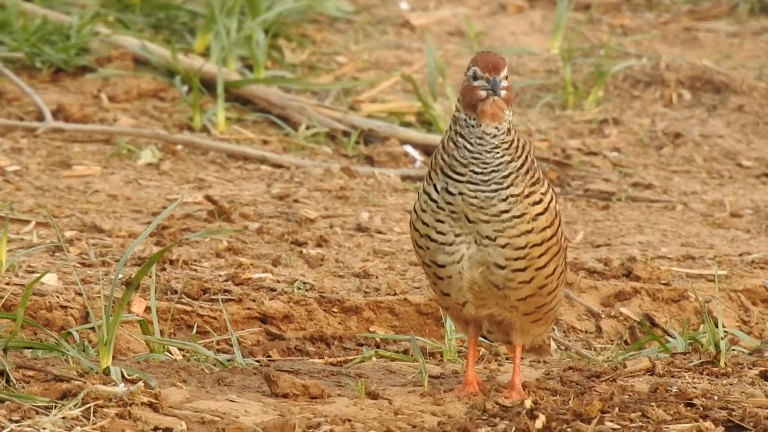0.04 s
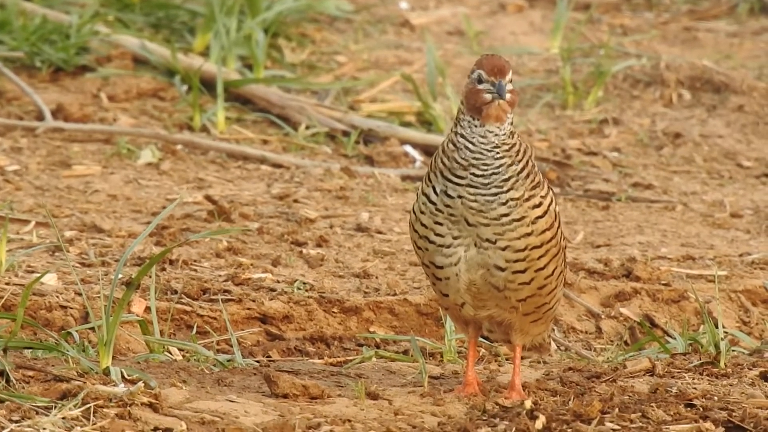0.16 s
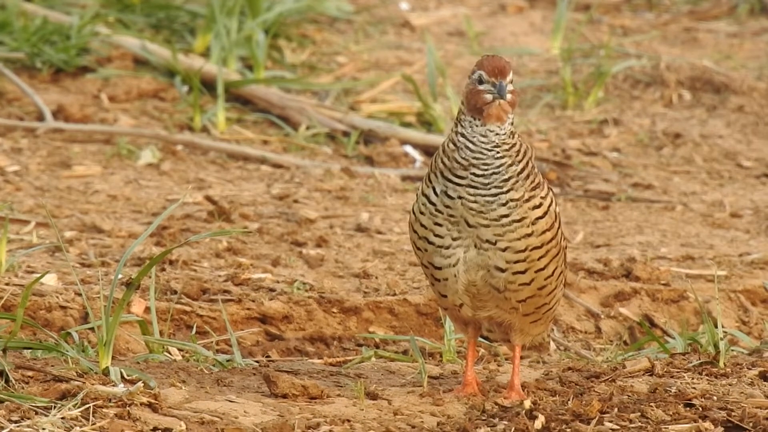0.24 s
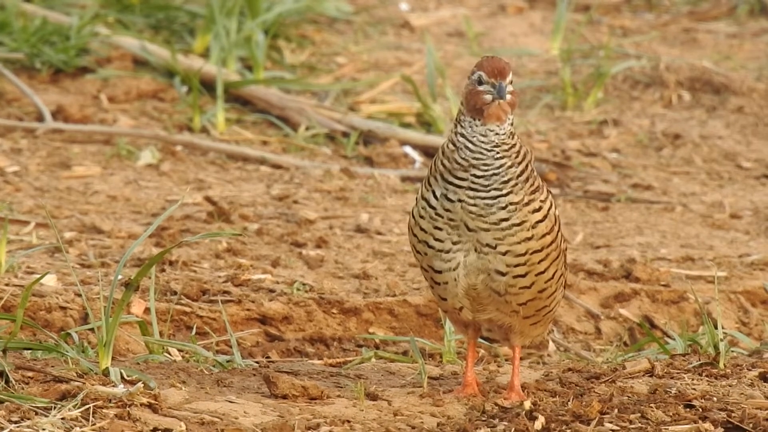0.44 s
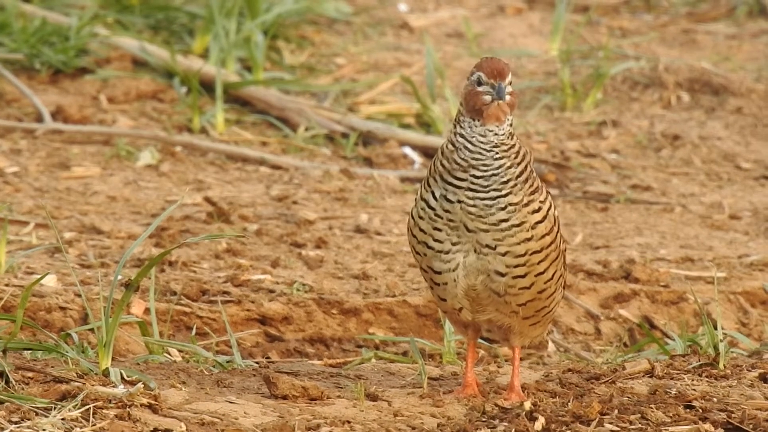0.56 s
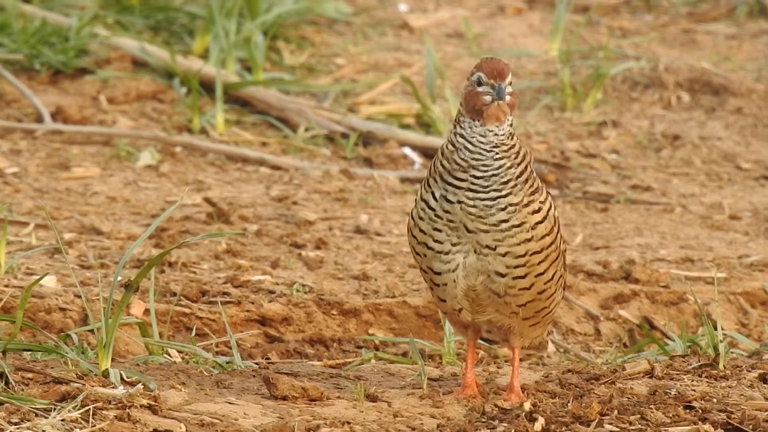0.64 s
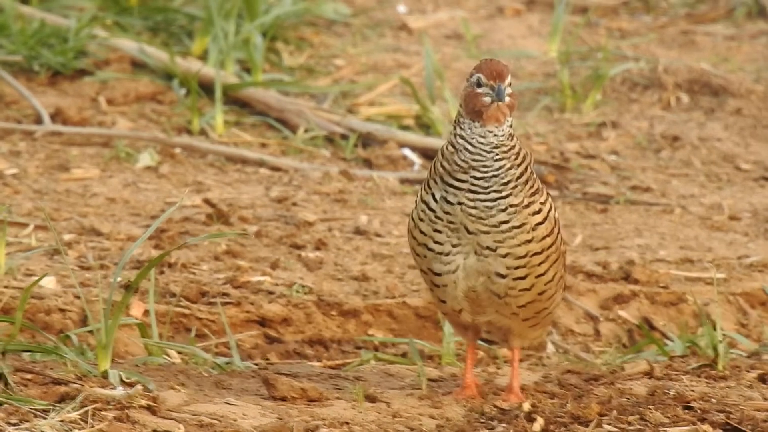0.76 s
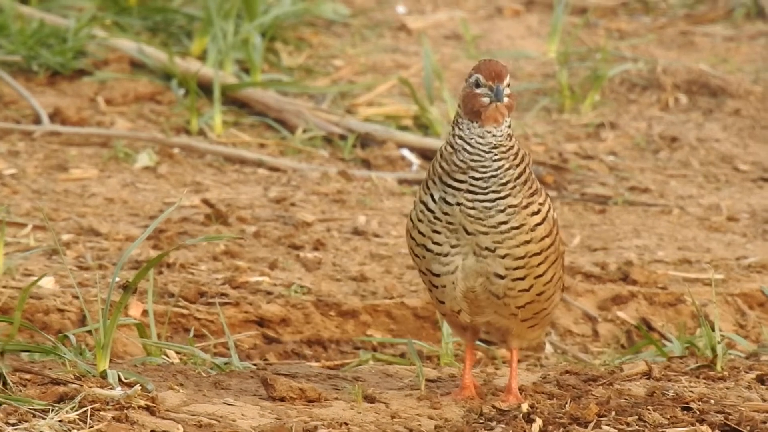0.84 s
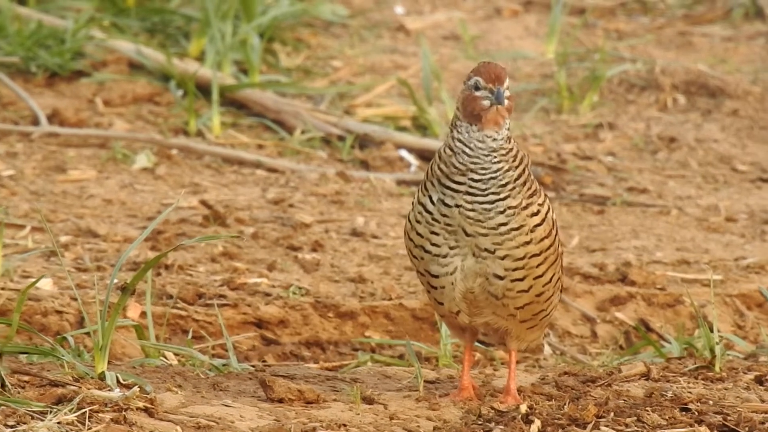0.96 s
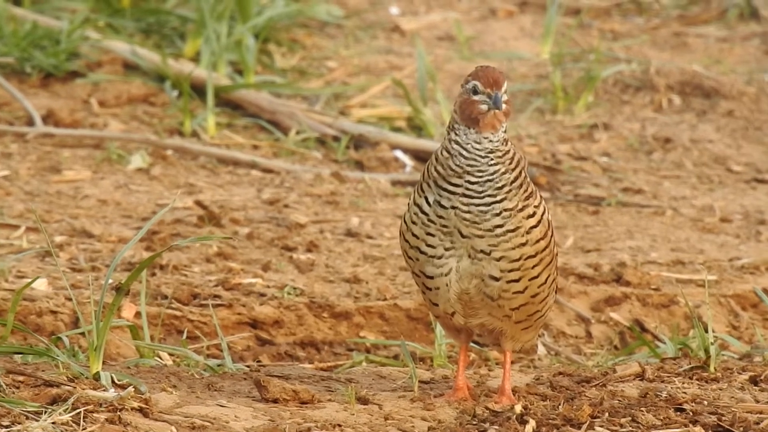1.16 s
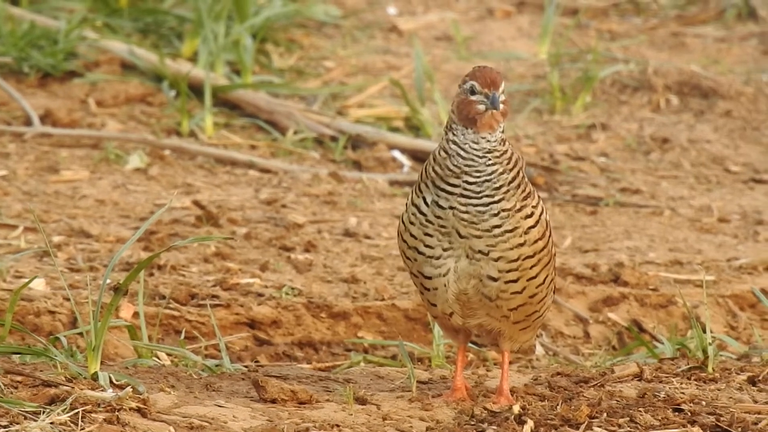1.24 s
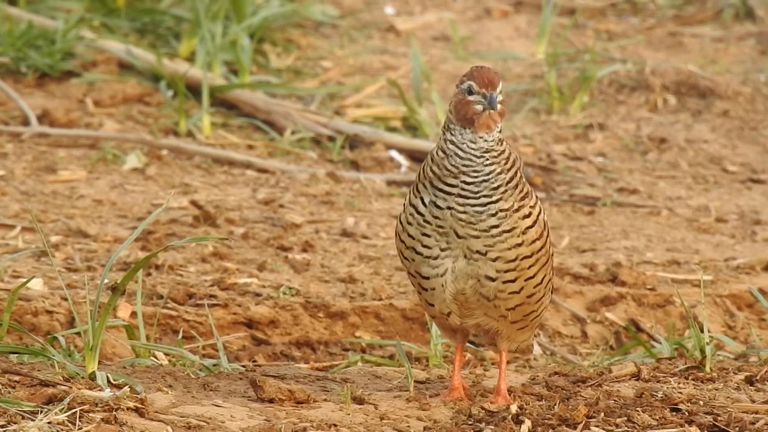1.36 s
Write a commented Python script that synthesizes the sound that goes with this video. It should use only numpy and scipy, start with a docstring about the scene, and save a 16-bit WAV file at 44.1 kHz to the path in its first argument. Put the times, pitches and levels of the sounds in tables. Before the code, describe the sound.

A quail gives two soft peeps and two loud chirps outdoors, with faint distant birds.

```python
"""Bare ground in scrub: a quail close to the microphone gives two soft peeps, then two loud chirps.
Each chirp opens with a rasp, leaps to a whistle in which the two sides of the syrinx beat, and ends
in two quick arches. Small birds whistle farther off to the right; the scrub scatters all the calls.
One knock, faint rustles and two puffs of air on the microphone sit over a quiet hush."""
import sys
import numpy as np
from scipy import signal
from scipy.fft import rfft, irfft
from scipy.io import wavfile
from scipy.ndimage import uniform_filter1d, minimum_filter1d

SR = 44100
rng = np.random.default_rng(int(sys.argv[2]) if len(sys.argv) > 2 else 0)


def generate_wav(sig):
    """Save sig (samples, or channels by samples) to the path in sys.argv[1] as 16-bit PCM at SR."""
    pcm = np.round(np.clip(np.atleast_2d(sig).T, -1, 1) * 32767).astype(np.int16)
    wavfile.write(sys.argv[1], SR, pcm)


N = 61739
T = np.arange(N) / SR
JITTER_RATE_HZ = 508


def quail_chirps():
    """Two voices glide a few hundred hertz apart and beat; fast glides turn hoarse."""
    # chirp contours: (time [s], pitch [Hz], level [dB], octave level [dB],
    # second voice offset [Hz], second voice re first [dB])
    first_chirp = [(.232, 3000, -58.5, -50, 599.4, 8), (.245, 2896, -51, -29, 550.6, -1.5),
                   (.257, 2810, -42.5, -22.5, 371, 7.5), (.273, 3105, -36, -12.5, 395, -12),
                   (.277, 3845, -16, -30.5, 300, -16), (.281, 4720, -7, -36, 452, -6),
                   (.287, 4916, -10, -56, 347, -1), (.305, 4820, -16.5, -49, 270, -8.5),
                   (.310, 4502, -18.5, -53.5, 355, 10.5), (.315, 3570, -23, -39, 495, -8),
                   (.319, 3423, -21, -48, 400, -29), (.323, 4490, -10.5, -40, 253, -22),
                   (.327, 4890, -9.5, -47, 250, -18), (.330, 4130, -18.5, -42, 400, 0),
                   (.333, 3177, -26.5, -32, 300, -26), (.340, 3425, -20, -30.5, 202, -32),
                   (.345, 3570, -11.5, -28.5, 150, -35), (.356, 3910, -10.5, -41, 149, -29),
                   (.361, 4493, -10, -37, 494, -1), (.366, 3573, -18.5, -32, 495, -29),
                   (.372, 3280, -17, -30.5, 398, -12), (.376, 3607, -14.5, -41, 840, -6),
                   (.383, 3060, -36, -50, 694, 1)]
    second_chirp = [(.942, 2800, -62, -50, 600, 1), (.962, 2859, -49.5, -35, 600, 6.5),
                    (.970, 3000, -41, -21, 510, -20), (.978, 3023, -37.5, -11, 204, -15),
                    (.982, 3200, -33, -12, 304, -12), (.987, 3767, -17.5, -30.5, 306, -15),
                    (.993, 4710, -8, -38.5, 400, -6), (.998, 4950, -10.5, -51, 317, -4),
                    (1.015, 4890, -13, -51, 272, -4.5), (1.022, 4863, -15, -48, 320, 0),
                    (1.027, 3697, -28, -41, 593, -33), (1.034, 3360, -19.5, -33.5, 400, -8),
                    (1.038, 4657, -10, -41, 250, -15), (1.042, 4950, -9.5, -70, 294, -19),
                    (1.047, 3576, -28, -42, 294, -10), (1.054, 3318, -17.5, -28.5, 198, -15),
                    (1.062, 3450, -27, -41, 150, -25), (1.065, 3517, -11.5, -29.5, 149, -46),
                    (1.074, 3972, -9.5, -46, 199, -20), (1.078, 4470, -10, -50, 442, -6.5),
                    (1.084, 3325, -17, -32, 450, -6), (1.090, 3224, -17.5, -31.5, 456, -25),
                    (1.097, 2720, -36, -41, 503, -8)]
    # air hiss riding on the tones: (frequency [Hz], density [dB])
    air_colour = [(600, -34), (1600, -11), (3000, -3.5), (6500, 4.5), (9000, -8.5), (12000, -12.5),
                  (16000, -24)]
    hoarse_hz_per_s, air_db = 44000, -30
    chirps = np.zeros(N)
    for contour in (first_chirp, second_chirp):
        hz, level_db, octave_db, offset_hz, second_db = follow(contour, T)
        glide_hz_per_s = uniform_filter1d(abs(np.gradient(hz)) * SR, size=200)
        hoarseness = 0.3 + np.tanh(glide_hz_per_s / hoarse_hz_per_s)
        air = amp(air_db + level_db) * hoarseness * noise(lambda f: amp(at_hz(air_colour, f)))
        lower = syrinx_voice(hz, level_db, octave_db)
        upper = amp(second_db) * syrinx_voice(hz + offset_hz, level_db, octave_db)
        chirps += gate(contour[0][0], contour[-1][0]) * (lower + upper + air)
    return chirps


def syrinx_voice(hz, level_db, octave_db):
    """One side of the syrinx: a slightly unsteady tone with two rougher overtones."""
    # throat response on the overtones: (frequency [Hz], gain [dB])
    throat = [(3000, 6.5), (7300, 0), (8500, -4.5), (10500, -7), (12000, -22), (16000, -28)]
    jitter, rough_rad, third_db, shimmer_db = 0.009, 0.26, -14, 1.5
    phase = phase_of(hz * (1 + jitter * wander(JITTER_RATE_HZ)))
    rough_phase = phase + rough_rad * wander(2 * JITTER_RATE_HZ)
    third_gain = amp(third_db) / (1 + amp(octave_db - level_db))
    overtones = np.sin(2 * rough_phase) + third_gain * np.sin(3 * rough_phase)
    tone = amp(level_db) * np.sin(phase) + coloured(amp(octave_db) * overtones, throat)
    return np.sqrt(2) * amp(shimmer_db * wander(JITTER_RATE_HZ)) * tone


def quail_rasps():
    """A grainy swell with a ragged falling tone, before each chirp's whistle locks in."""
    # rasps: (start [s], peak [s], end [s], level [dB])
    swells = [(.222, 0.247, .277, -20.5), (0.942, 0.968, 0.99, -20)]
    # rasp noise: (frequency [Hz], density [dB])
    colour = [(1500, -55), (2700, -26), (3800, -17.5), (4600, 4.5), (5100, 2.5), (5500, 1), (6300, -9),
              (7300, -8), (8000, -18), (10000, -32.5), (16000, -43)]
    rise_db, fade_db, grain_db, grain_hz = 25, 14.5, 1.5, 615
    fall_hz, tone_db, jitter = (7800, 6230), -7, 0.0351
    rasps = np.zeros(N)
    for start, peak, end, db in swells:
        swell_db = np.interp(T, [start, peak, end], [-rise_db, 0, -fade_db])
        swell_db += grain_db * wander(grain_hz)
        hz = np.interp(T, [start, end], fall_hz) * (1 + jitter * wander(grain_hz))
        tone = amp(tone_db) * np.sqrt(2) * np.sin(phase_of(hz))
        hiss = noise(lambda f: amp(at_hz(colour, f)))
        rasps += gate(start, end) * amp(db + swell_db) * (tone + hiss)
    return rasps


def quail_peeps():
    """Soft notes that step up, flutter as the second voice joins, and drop away."""
    # peeps: (start [s], length [s], gain [dB])
    notes = [(.008, .072, -27), (0.145, .070, -27.5)]
    # peep contour: (progress [0-1], pitch [Hz], level [dB], octave level [dB])
    contour = [(0, 1404, -26, -24), (.22, 2251, -11, -22.5), (.33, 2453, -7.5, -24),
               (.62, 2443, -9.5, -27.5), (.7, 2646, -4, -22), (.87, 2930, 0.5, -16.5),
               (.92, 2154, -17.5, -13), (1, 1530, -28, -10.5)]
    beat_hz, second_db = 228.8, -12.5
    peeps = np.zeros(N)
    for start, length, db in notes:
        progress = (T - start) / length
        hz, level_db, octave_db = follow(contour, progress)
        joined = np.clip((progress - 0.62) / 0.08, 0, 1)
        lower = amp(second_db) * joined * syrinx_voice(hz - beat_hz, level_db, octave_db)
        upper = syrinx_voice(hz, level_db, octave_db)
        peeps += gate(start, start + length) * amp(db) * (upper + lower)
    return peeps


def distant_birds():
    """Small birds whistle short, pure glides."""
    # whistles: (start [s], length [s], start pitch [Hz], end pitch [Hz], level [dB])
    glides = [(0.519, 0.028, 5800, 5360, -53), (0.573, .035, 6100, 5360, -50),
              (.632, 0.045, 6200, 5530, -50.5), (0.688, .028, 6100, 5370, -51),
              (.715, 0.052, 5400, 4750, -49.5), (0.727, 0.076, 3600, 3090, -54.5),
              (0.671, 0.056, 2380, 2314, -57), (0.757, 0.043, 2200, 2630, -60),
              (0.793, 0.022, 6080, 5390, -40.5), (.861, 0.019, 6080, 5430, -41),
              (.934, 0.026, 6050, 5510, -38.5), (1.115, .074, 4150, 5200, -29.5),
              (1.163, 0.022, 5950, 5680, -36.5), (1.17, 0.035, 5850, 4730, -34),
              (1.273, 0.032, 6750, 6600, -47)]
    jitter = 0.0048
    whistles = np.zeros(N)
    for start, length, from_hz, to_hz, db in glides:
        hz = np.interp(T, [start, start + length], [from_hz, to_hz])
        hz *= 1 + jitter * wander(JITTER_RATE_HZ)
        whistles += np.sqrt(2) * amp(db) * arch(start, length) * np.sin(phase_of(hz))
    return whistles


def knock():
    """One dull, woody knock: a sum of damped modes."""
    # modes: (frequency [Hz], level [dB], t60 [s])
    modes = [(216, -7, 0.097), (414, -10.5, 0.069), (640, -0.5, 0.021), (688, -7, 0.098),
             (940, -5.5, 0.035), (1780, -17, 0.022)]
    start_s, gain_db, low_cut_hz = 0.796, -32, 176
    t = np.maximum(T - start_s, 0)
    ring = sum(amp(db - 60 * t / t60) * np.sin(2 * np.pi * hz * t) for hz, db, t60 in modes)
    low_cut = signal.butter(2, low_cut_hz, "high", fs=SR, output="sos")
    return amp(gain_db) * signal.sosfilt(low_cut, ring)


def feather_rustles():
    """Small dry rustles of the quail's feet and feathers: swells of band noise."""
    # stirs: (start [s], length [s], centre [Hz], level [dB])
    stirs = [(.508, .016, 6360, -49), (0.884, 0.058, 2580, -47.5), (1.266, 0.035, 4670, -46),
             (1.342, .055, 2100, -49.5)]
    log_width = 0.2
    rustles = np.zeros(N)
    for start, length, hz, db in stirs:
        band = noise(lambda f: np.exp(-(np.log((f + 1) / hz) / log_width) ** 2 / 2))
        rustles += amp(db) * arch(start, length) * band
    return rustles


def air_puffs():
    """Air on the microphone: brief low rumbles, independent in each channel."""
    # puffs: (start [s], length [s], level [dB])
    puffs = [(0.194, 0.077, -38.5), (0.318, 0.034, -42)]
    centre_hz, width_hz = 69, 22
    envelope = sum(amp(db) * arch(start, length) for start, length, db in puffs)
    rumble = [noise(lambda f: np.exp(-((f - centre_hz) / width_hz) ** 2)) for _ in range(2)]
    return envelope * np.array(rumble)


def scrub_echo(calls, peeps):
    """Dense scatter off ground and bushes, wider in the treble, with a faint longer tail."""
    # scatter of the calls: (frequency [Hz], gain [dB])
    call_colour = [(600, -9), (2400, 9.5), (3000, -1), (3300, 1), (3800, -3.5), (5000, 0.5), (6200, -2.5),
                   (8000, -4), (14000, 6)]
    # scatter of the peeps, whose held note lingers: (frequency [Hz], gain [dB])
    peep_colour = [(1400, 9), (2250, -2), (2410, 12), (2560, 3.5), (2900, 1.5), (4000, 1.5), (6000, 0)]
    # scatter width: (frequency [Hz], left-right coherence [0-1])
    stereo_coherence = [(500, 0.7), (3300, 0.82), (4200, 0.41), (5000, 0.26), (6200, 0.12), (12000, 0.072)]
    delay_s = 0.005
    near, far = (-9, 0.21), (-24.5, 0.91)  # (level [dB], t60 [s])
    t = np.maximum(T - delay_s, 0)
    spectra = rfft(rng.standard_normal((3, N)))
    coherence = at_hz(stereo_coherence, np.fft.rfftfreq(N, 1 / SR))
    taps = irfft(np.sqrt(coherence) * spectra[0] + np.sqrt(1 - coherence) * spectra[1:], N)
    power = sum(amp(db) ** 2 * unit((t > 0) * amp(-60 * t / t60)) ** 2 / N for db, t60 in (near, far))
    send = coloured(calls, call_colour) + coloured(peeps, peep_colour)
    return signal.fftconvolve(send[None], taps * np.sqrt(power), axes=1)[:, :N]


def hush():
    """Distant rumble and high hiss with drifting patches."""
    # background spectrum: (frequency [Hz], density [dB])
    colour = [(15, -33), (30, -34), (70, -2.5), (120, -3.5), (205, 0.5), (290, -15), (430, -14), (580, -11),
              (760, -16), (1100, -15.5), (1400, -18.5), (2300, -12.5), (2700, -16), (3900, -18.5),
              (4400, -12), (5700, -11), (6550, -13.5), (8100, -25.5), (15500, -41.5)]
    # background width: (frequency [Hz], left-right coherence [0-1])
    stereo_coherence = [(30, .3), (70, 0.92), (150, .85), (1500, 0.84), (5000, 0.24), (12000, 0.18)]
    # low-mid lift: (time [s], gain [dB])
    mid_lift = [(0, 5.5), (.1, 7.5), (.22, -1), (.9, -1.5), (1.4, -2)]
    rms_db, patch_db, mid_hz = -45.5, 3.5, 600
    frames, hz = N // 256 + 5, np.fft.rfftfreq(1024, 1 / SR)
    left_re, left_im, own_re, own_im, patches = rng.standard_normal((5, frames, len(hz)))
    coherence = at_hz(stereo_coherence, hz)
    left = left_re + 1j * left_im
    right = coherence * left + np.sqrt(1 - coherence ** 2) * (own_re + 1j * own_im)
    patches = unit(uniform_filter1d(uniform_filter1d(patches, size=8, axis=0), size=8, axis=1))
    lift_db, = follow(mid_lift, np.linspace(0, N / SR, frames))
    mid_band = np.exp(-(np.log((hz + 1) / mid_hz) / 1.26) ** 2)
    shape_db = at_hz(colour, hz) + patch_db * patches + lift_db[:, None] * mid_band
    spectra = np.array([left, right]) * amp(shape_db)
    _, pair = signal.istft(spectra.transpose(0, 2, 1), nperseg=1024, noverlap=768)
    return amp(rms_db) * unit(pair[:, :N])


def mic_ports(x, left_lag_s=0):
    """Each port colours the sound; sound from the right reaches the left one later."""
    # port imbalance: (frequency [Hz], left minus right [dB])
    balance = [(100, -1), (600, 9), (1300, .4), (2500, 4), (3300, -.7), (4100, 3), (5000, 2), (5800, 4.5),
               (6600, 0.8), (7700, 3), (11000, -.5)]
    hz = np.fft.rfftfreq(2 * N, 1 / SR)
    side = np.array([[0.5], [-0.5]])
    gain = amp(side * at_hz(balance, hz))
    delay = np.exp(-2j * np.pi * hz * side * left_lag_s)
    return irfft(rfft(x, 2 * N) * gain * delay, 2 * N)[:, :N]


def amp(db):
    """Decibels to gain."""
    return 10 ** (np.asarray(db) / 20)


def unit(x):
    """Scales to unit rms."""
    return x / np.sqrt(np.mean(x ** 2) + 1e-20)


def phase_of(hz):
    """Running phase [rad] of a pitch curve."""
    return 2 * np.pi * np.cumsum(hz) / SR


def at_hz(table, hz):
    """Interpolates a table on a log-frequency axis."""
    f, value = np.transpose(table)
    return np.interp(np.log(hz + 1), np.log(f + 1), value)


def follow(table, t):
    """Interpolates the other columns at positions t along the first."""
    axis, *columns = np.transpose(table)
    return [np.interp(t, axis, column) for column in columns]


def coloured(x, colour):
    """Filters by a table of (frequency [Hz], gain [dB])."""
    gain = amp(at_hz(colour, np.fft.rfftfreq(2 * N, 1 / SR)))
    return irfft(rfft(x, 2 * N) * gain)[:N]


def noise(gain):
    """Unit-rms noise with the spectrum gain(Hz)."""
    return unit(irfft(rfft(rng.standard_normal(N)) * gain(np.fft.rfftfreq(N, 1 / SR)), N))


def wander(rate_hz):
    """Random drift up to about rate_hz."""
    return noise(lambda f: np.exp(-(f / rate_hz) ** 2))


def gate(start_s, end_s, edge_s=0.0011):
    """Soft-edged on/off envelope."""
    return np.sin(np.pi / 2 * np.clip(np.minimum(T - start_s, end_s - T) / edge_s, 0, 1)) ** 2


def arch(start_s, length_s):
    """Half-sine envelope."""
    return np.sin(np.pi * np.clip((T - start_s) / length_s, 0, 1))


def scene():
    """Quail in front, small birds farther off to the right, all in open air."""
    chirps = quail_chirps() + quail_rasps()
    peeps = quail_peeps()
    birds = distant_birds()
    near = chirps + peeps + knock() + feather_rustles()
    echo = scrub_echo(chirps + birds, peeps)
    return mic_ports(near + echo) + mic_ports(birds, left_lag_s=34e-6) + hush() + air_puffs()


def record(dry):
    """A quick limiter holds the loudest peaks, which just clip; then a low-pass."""
    ceiling, limiter_s, cutoff_hz = 1.03, 0.002, 15725
    size = round(limiter_s * SR)
    gain = np.minimum(1, ceiling / (abs(dry).max(0) + 1e-9))
    held = dry * uniform_filter1d(minimum_filter1d(gain, size=size), size=size)
    low_pass = signal.firwin(511, cutoff_hz, window=("kaiser", 9), fs=SR)
    return signal.oaconvolve(np.clip(held, -1, 1), low_pass[None], "same")


dry = scene()
out = record(dry)
generate_wav(out)
```